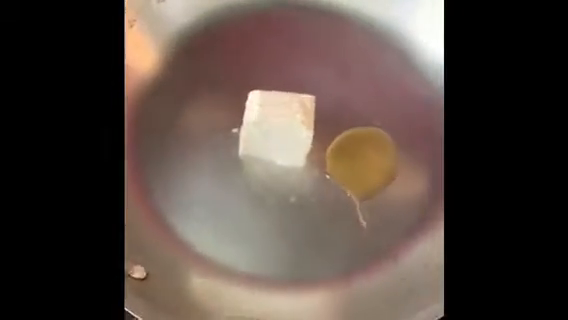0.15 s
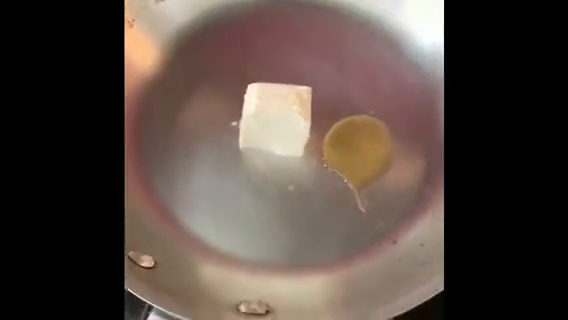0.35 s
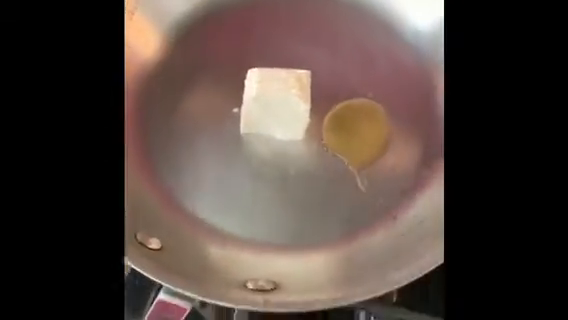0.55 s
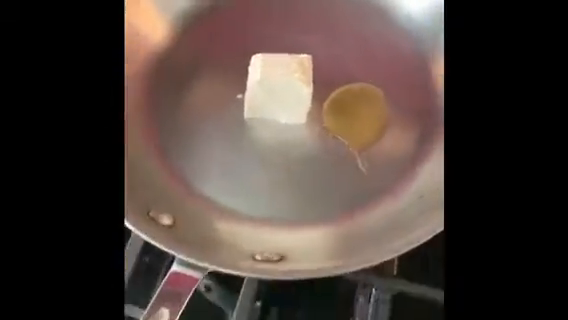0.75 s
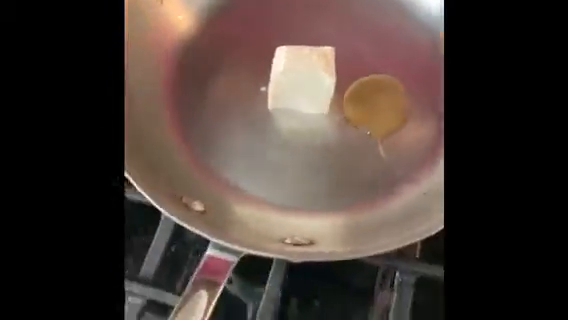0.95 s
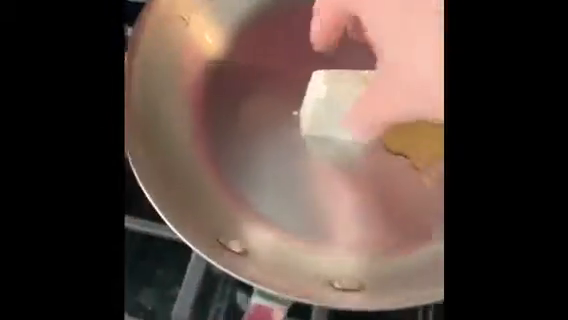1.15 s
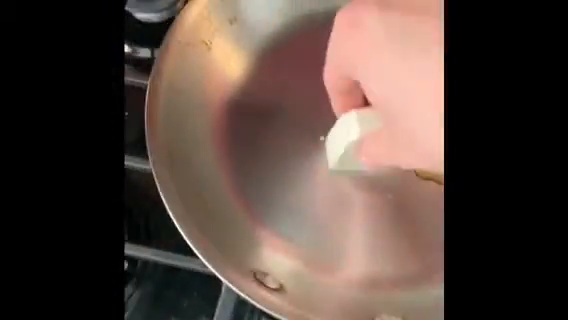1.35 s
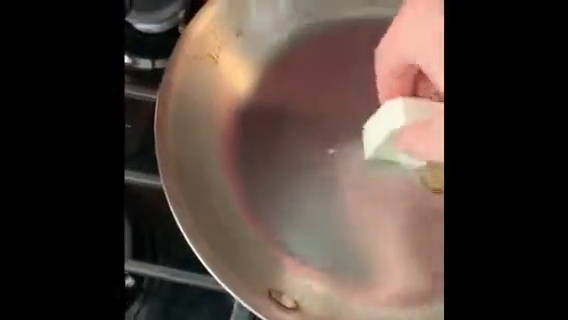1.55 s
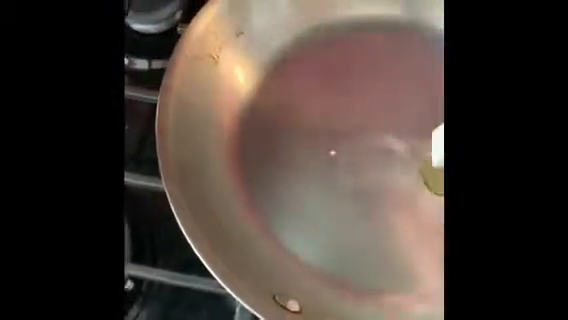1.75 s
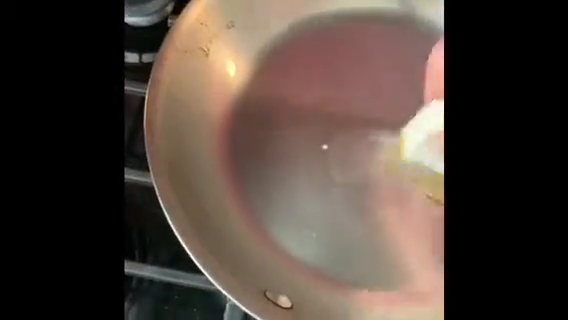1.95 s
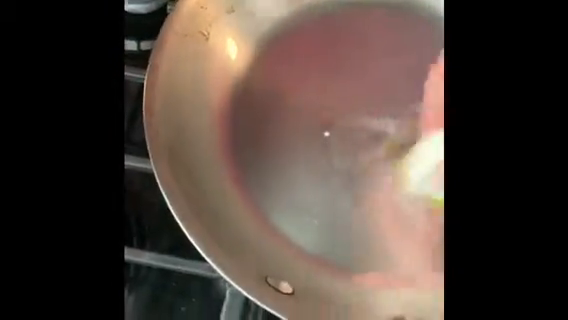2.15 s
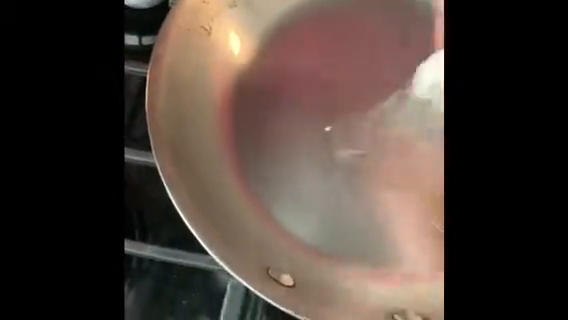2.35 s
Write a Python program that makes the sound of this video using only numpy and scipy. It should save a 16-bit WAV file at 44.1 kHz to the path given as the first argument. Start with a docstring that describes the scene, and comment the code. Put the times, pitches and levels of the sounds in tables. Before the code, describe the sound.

Metal pan set down hard on a gas stove grate, rattling and ringing briefly, faint taps later

```python
"""A clattering set-down: a steel frying pan lands on the iron grate of a gas stove, skids with a short squeak
and settles. Each blow is a short clank, a noisy grate rattle, a stove-top boom and a pan ring made of fading sines.
A soft rustle of grainy noise follows, then light taps, a tick, a clink and scraping from noise and fading sines.
A small kitchen adds reflections, over a steady low rumble and a faint hiss of shaped noise."""
import sys
import numpy as np
from scipy import signal
from scipy.fft import rfft, irfft
from scipy.io import wavfile
from scipy.ndimage import uniform_filter1d

SR = 44100
rng = np.random.default_rng(int(sys.argv[2]) if len(sys.argv) > 2 else 0)


def materialize(psi):
    """Save the field psi as 16-bit PCM at rate SR to the path in sys.argv[1].

    A 1-D psi becomes a single channel; in a 2-D psi each row is a channel.
    """
    bounded = np.clip(np.atleast_2d(psi).T, -1, 1)
    quanta = np.round(bounded * 32767).astype(np.int16)
    wavfile.write(sys.argv[1], SR, quanta)


N = 105840
T = np.arange(N) / SR  # time of each sample, s
EARS = np.array([[1], [-1]])  # opposite signs for left and right

# colour of the noise in the clink, taps and scrape: f/Hz, level per Hz/dB
TAP_NOISE_COLOUR = [(200, -28.5), (550, -6), (800, 2), (1500, -1.5), (2200, -9.5), (4500, -10),
                    (15000, -34.5)]


def amp(db):
    """Turn decibels into gain."""
    return 10 ** (np.asarray(db) / 20)


def fade(t60):
    """Die away exponentially, dropping 60 dB in t60 seconds."""
    return np.exp(-np.log(1000) * T / t60)


def lookup(hz, points):
    """Read a table between its points, with pitch on a log scale."""
    p = np.array(points, float)
    return np.interp(np.log(hz + 1e-9), np.log(p[:, 0]), p[:, 1])


def freqs():
    """Give the frequency of each spectral bin in Hz."""
    return np.arange(N // 2 + 1) * SR / N


def width(hz):
    """Set the side gain against mid: bass is alike in both ears, treble is not."""
    # difference between the ears: f/Hz, side against mid/dB
    spread = [(60, -18), (150, -13.5), (300, -11), (600, -10), (1100, -2.5), (2200, 0.5), (4400, 0.5),
              (12000, -2.5)]
    return amp(lookup(hz, spread))


def noise(colour):
    """Make stereo noise of a given colour, with rms 1."""
    mid, side = rfft(rng.standard_normal((2, N)))
    stereo = mid + EARS * width(freqs()) * side
    y = irfft(stereo * amp(lookup(freqs(), colour)), N)
    return y / y.std()


def uneven(size):
    """Wander at random with rms 1; averaging over more samples makes it slower."""
    wander = uniform_filter1d(rng.standard_normal(N), size=size)
    return wander / wander.std()


def ring(modes, rise_cycles=None):
    """Sum one second of fading sines of alternating sign; high ones reach the ears out of step."""
    out, t = np.zeros((2, N)), T[:SR]
    for k, (hz, db, t60) in enumerate(modes):
        skew = np.arctan(0.95 * width(hz)) * rng.choice([-1, 1]) * EARS
        build = 1 - np.exp(-t * hz / rise_cycles) if rise_cycles else 1
        decay = np.exp(-np.log(1000) * t / t60)
        tone = np.sin(2 * np.pi * hz * t + skew)
        out[:, :SR] += (-1) ** k * amp(db) * build * decay * tone
    return out


def add(out, x, start):
    """Mix a sound in, starting at a time in seconds."""
    i = int(start * SR)
    out[:, i:] += x[:, :N - i]


def background():
    """Shape steady noise into a low rumble and a faint hiss."""
    # rumble: f/Hz, level per Hz/dB
    rumble_colour = [(20, -14.5), (45, -6.5), (75, 0.5), (125, -4.5), (200, -11), (400, -16), (750, -18),
                     (1100, -33.5), (1700, -47), (4000, -46.5), (15000, -65)]
    # hiss: f/Hz, level per Hz/dB
    hiss_colour = [(2000, -5), (2650, 5), (2950, 14.5), (3300, -2), (4200, -10.5), (5100, 1.5),
                   (6200, -17.5), (7400, 2.5), (9000, -14.5), (11800, 3), (15500, -16.5)]
    return amp(-57.5) * noise(rumble_colour) + amp(-71) * noise(hiss_colour)


def clank(hz, rise):
    """Sound the first cycle or two of a contact, with one overtone, out of step between the ears."""
    phase = 2 * np.pi * hz * T
    skew = np.arctan(0.9 * width(hz)) * EARS
    pulse = T / rise * np.exp(1 - T / rise)  # peaks at 1 after `rise` seconds
    overtone = amp(-11) * np.sin(1.85 * phase + skew)
    return pulse * (np.sin(phase + skew) + overtone)


def grate_rattle(spreading):
    """Let dense noise build up as the blow spreads into the iron grate, then die away."""
    # the iron grate's dense rattle: f/Hz, level per Hz/dB
    rattle_colour = [(40, -37), (130, 8.5), (380, 6.5), (1050, -3.5), (1400, -3.5), (2400, -8), (3000, -21),
                     (4400, -20), (6900, -31), (8000, -32), (15000, -48)]
    return amp(-13.5) * fade(0.13) * spreading * noise(rattle_colour)


def stove_boom():
    """Swell and fade the stove top's low modes, each pitch spread slightly at random from blow to blow."""
    # modes of the sheet-metal stove top: f/Hz
    stove_hz = [68, 138, 181, 229, 265, 331, 397, 435, 472, 566, 618]
    # strength of those modes in the same order: level/dB
    stove_db = [-26.5, -17.5, -21.5, -15.5, -42, -15.5, -15.5, -27.5, -32.5, -23, -19]
    t60_at_250_hz, detune = 0.15, 0.005  # s, random spread as a fraction of pitch
    pitches = np.array(stove_hz) * (1 + detune * rng.standard_normal(len(stove_hz)))
    modes = [(hz, db, t60_at_250_hz * np.sqrt(250 / hz)) for hz, db in zip(pitches, stove_db)]
    return ring(modes, rise_cycles=2.6)


def pan_ring(point):
    """Ring the pan's modes; the point of contact decides which ones speak."""
    # modes of the pan: f/Hz
    pan_hz = [851, 884, 923, 1078, 1165, 1402, 1826, 2159, 2358, 2676, 2790, 3378, 3720, 4318, 4511, 5136,
              5300, 5884, 6368]
    # two rows, struck at contact point 0 and at point 1, modes in the same order: level/dB
    pan_db = [
        [-29.5, -20.5, -33.5, -35, -37.5, -39, -40.5, -33, -27, -35.5, -52, -46, -34, -41, -52.5, -54, -46.5,
         -47.5, -52.5],
        [-26.5, -35.5, -18.5, -23.5, -22.5, -33.5, -31, -46.5, -31, -36, -28.5, -29, -42, -37, -45, -36.5, -51,
         -49.5, -43.5],
    ]
    t60_at_1_khz, damping = 0.19, 0.23  # s, power by which it falls with pitch
    levels = (1 - point) * np.array(pan_db[0]) + point * np.array(pan_db[1])
    return ring([(hz, db, t60_at_1_khz * (hz / 1000) ** -damping) for hz, db in zip(pan_hz, levels)])


def pan_overtones(count=70):
    """Ring irregularly spaced high modes of the pan, of uneven strength; the highest die first."""
    # the pan's many faint high overtones: f/Hz, level of each/dB
    shimmer_levels = [(1300, -39.5), (2400, -42.5), (3000, -47.5), (4400, -60.5), (6000, -63), (6900, -65),
                      (8000, -41.5), (9700, -63), (11500, -48), (15000, -61)]
    place = rng.random(count)
    hz = 1300 + 14000 * ((np.arange(count) + place) / count) ** 1.4
    scatter_db = 2.5 * np.clip(rng.standard_normal(count), -2, 1)
    levels = lookup(hz, shimmer_levels) + scatter_db
    t60s = 0.15 * (1 - hz / SR)
    return ring(list(zip(hz, levels, t60s)))


def brighten(x, db):
    """Raise or lower the treble with a shelf: harder contacts are brighter."""
    high = signal.sosfilt(signal.butter(1, 3560, "high", fs=SR, output="sos"), x)
    return x + (amp(db) - 1) * high


def pan_blows():
    """Each blow clanks for a cycle or two, then spreads into the grate, the pan and the stove top."""
    # pan on grate: t/s, level/dB, clank/dB, clank f/Hz, stove boom/dB, pan ring/dB,
    # contact point (0 to 1), treble/dB
    blows = [(0.214, -24, -8, 507, 0.5, 5, 0.46, -6.5), (0.2239, -2.5, 4.5, 567, 1.5, 6, 0, -16.5),
             (0.2503, -3.5, 6.5, 1002, 2.5, 3.5, 0, -17.5), (0.2820, -21.5, 11, 200, 15, -5, 0, -3),
             (0.3612, -12, 2.5, 630, 8, -2, 0.7, -17.5), (0.3911, 1, 0.5, 1035, -1, 2.5, 0.8, 1.5),
             (0.4990, -25, 16, 366, 6, 2, 1, -23), (0.683, -36.5, 5, 554, 8.5, -5, .8, -19)]
    clank_rise = 0.001  # s
    out = np.zeros((2, N))
    spreading = 1 - np.exp(-T / 0.0029)
    shimmer = pan_overtones() * (1 - np.exp(-T / clank_rise))
    for start, db, clank_db, clank_hz, boom_db, ring_db, point, treble_db in blows:
        contact = amp(-10 + clank_db) * clank(clank_hz, clank_rise)
        rattle = grate_rattle(spreading)
        boom = amp(boom_db) * stove_boom()
        pan = amp(ring_db) * (pan_ring(np.clip(point, 0, 1)) + shimmer)
        add(out, amp(db) * brighten(contact + rattle + boom + pan, treble_db), start)
    return out


def kitchen(x):
    """Add diffuse reflections whose treble dies first, using noise that fades band by band."""
    # kitchen reverberation: f/Hz, t60/s
    room_t60 = [(100, 0.63), (500, 0.63), (2000, 0.45), (6000, 0.32)]
    wash = rfft(noise([(20, 0), (20000, 0)]))
    octave = np.clip(np.round(np.log2((freqs() + 1) / 125)), 0, 7)
    tail = 0
    for k in range(8):
        t60 = lookup(125 * 2 ** k, room_t60)
        tail = tail + irfft(wash * (octave == k), N) * fade(t60)
    tail = tail * (T > 0.0061)  # silent gap before the reflections, s
    tail = tail / np.sqrt((tail ** 2).sum() / 2)
    return amp(-11.5) * signal.fftconvolve(x, tail, axes=1)[:, :N]


def squeaks():
    """Stick and slip drive one high mode of the pan while it skids."""
    # skids of steel on iron: t/s, length/s, level/dB
    skids = [(0.227, 0.032, -21.5), (0.282, 0.03, -41.5), (0.328, 0.035, -49.5)]
    squeak_hz, waver = 3343, 0.005  # centre pitch in Hz, rms waver as a fraction of it
    out = np.zeros((2, N))
    pitch = squeak_hz * (1 + waver * uneven(200))
    phase = 2 * np.pi * np.cumsum(pitch) / SR
    tone = np.sin(phase + width(squeak_hz) * np.array([[0], [1]]))
    for start, length, db in skids:
        swell = np.sin(np.pi * np.minimum(T / length, 1))
        add(out, amp(db) * tone * swell, start)
    return out


def rustle(grain_db=2, scuff_db=1.0):
    """Faint, grainy rubbing noise in uneven scuffs as a hand moves to the pan."""
    # colour of the rubbing: f/Hz, level per Hz/dB
    rustle_colour = [(60, 7), (160, 18), (400, 16), (900, 0), (2400, 2), (3600, -5.5), (5200, -4.5),
                     (8000, -17.5), (15000, -17)]
    # how loud the rubbing is, held steady before the first point and after the last: t/s, level/dB
    rustle_level = [(0.45, -72), (0.6, -66), (0.78, -60.5), (0.89, -61.5), (0.93, -56), (0.99, -60.5),
                    (1.045, -60.5), (1.062, -58.5), (1.15, -60.5), (1.22, -67.5), (1.34, -72), (1.42, -79),
                    (1.53, -66.5), (1.65, -76)]
    level = np.interp(T, *np.array(rustle_level).T)
    level = level + grain_db * uneven(300) + scuff_db * uneven(2000)
    return noise(rustle_colour) * amp(level)


def taps():
    """Light taps and duller bounces: a clank, a few modes and a noisy knock, softened by a low-pass."""
    # a softer contact has a lower cut-off: t/s, level/dB, cut-off f/Hz, low knock/dB
    tap_list = [(1.06, -16.5, 2970, 1.5), (1.5300, -25, 2200, 9), (1.9493, 2, 2370, -5),
                (1.9930, -1, 2100, 3.5), (2.0532, -6, 2010, 2.5), (2.1200, -6, 1085, 1.5)]
    # what the taps ring with: f/Hz, level/dB, t60/s
    tap_modes = [(698, -55, 0.36), (789, -48.5, 0.1), (984, -49, 0.11), (1435, -83, 0.14),
                 (1830, -49, 0.095)]
    # the dull knock under them: f/Hz, level per Hz/dB
    knock_colour = [(120, -1), (230, -18), (320, 4.5), (520, -18), (1500, -23)]
    out, modes = np.zeros((2, N)), ring(tap_modes)
    contact = amp(-37) * clank(1250, rise=0.0007)
    for start, db, cut_hz, knock_db in tap_list:
        knock = amp(-50.5 + knock_db) * noise(knock_colour)
        body = knock + amp(-55) * noise(TAP_NOISE_COLOUR)
        tap = contact + modes + body * fade(0.3)
        soft = signal.sosfilt(signal.butter(3, cut_hz, fs=SR, output="sos"), tap)
        add(out, amp(db) * soft, start)
    return out


def tick():
    """A thin tick: bright noise that rises quickly and dies away."""
    # colour of the tick: f/Hz, level per Hz/dB
    tick_colour = [(2000, -18), (4000, -20), (5500, -13), (8500, -11.5), (14000, -24)]
    out = np.zeros((2, N))
    rise = 1 - np.exp(-T / 0.0083)
    add(out, amp(-52) * noise(tick_colour) * fade(0.082) * rise, 1.578)
    return out


def clink():
    """A thin bright clink ahead of the last bounces: a few ringing modes and fading noise."""
    # modes of the clink: f/Hz, level/dB, t60/s
    clink_modes = [(964, -50, 0.14), (2620, -56, 0.21), (4000, -53, 0.16)]
    out = np.zeros((2, N))
    add(out, ring(clink_modes) + amp(-54.5) * noise(TAP_NOISE_COLOUR) * fade(0.2), 1.9178)
    return out


def scrape():
    """Uneven scraping noise that runs through the last taps and dies away."""
    out = np.zeros((2, N))
    level = -56 + 1 * uneven(200)  # dB
    add(out, noise(TAP_NOISE_COLOUR) * amp(level) * fade(0.8), 1.995)
    return signal.sosfilt(signal.butter(4, 2300, fs=SR, output="sos"), out)


def scene():
    """Mix the stove sounds, which radiate no deep bass, their reflections and the steady background."""
    contacts = pan_blows() + taps() + tick() + clink() + scrape()
    contacts = signal.sosfilt(signal.butter(2, 33, "high", fs=SR, output="sos"), contacts)
    squeak = squeaks()
    reflections = kitchen(contacts + amp(-10.5) * squeak)
    out = background() + contacts + squeak + reflections + rustle()
    left_over_right_db = 1
    return out * amp(EARS * left_over_right_db / 2)


def record(dry):
    """Cut the very top of the treble with a steep low-pass at 15.8 kHz."""
    return signal.sosfilt(signal.ellip(8, .2, 70, 15800, fs=SR, output="sos"), dry)


dry = scene()
out = record(dry)
materialize(out)
```